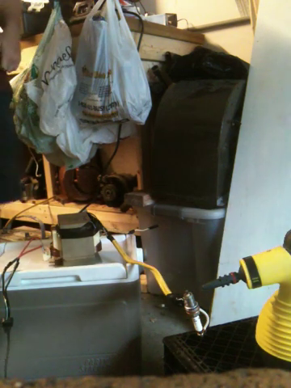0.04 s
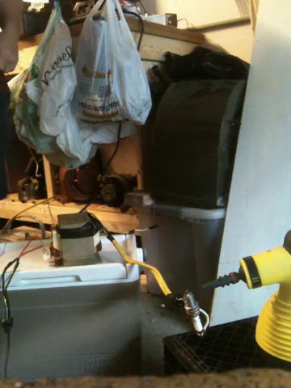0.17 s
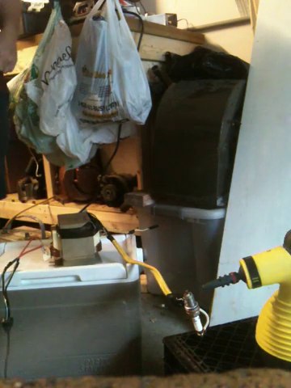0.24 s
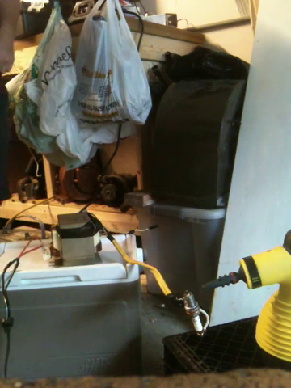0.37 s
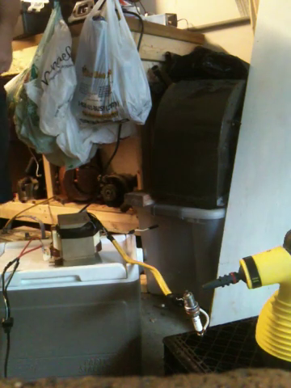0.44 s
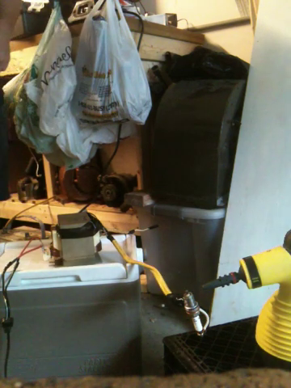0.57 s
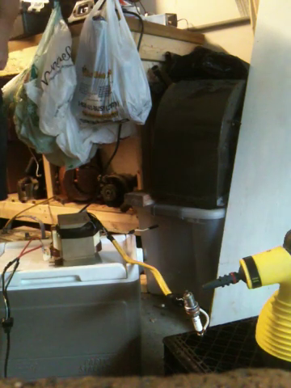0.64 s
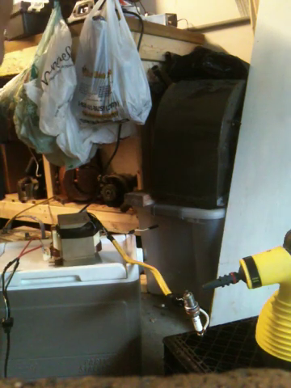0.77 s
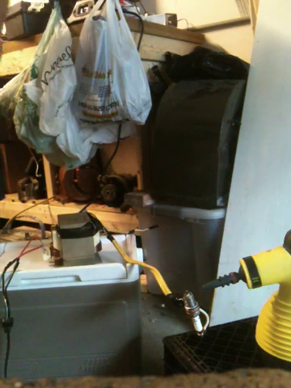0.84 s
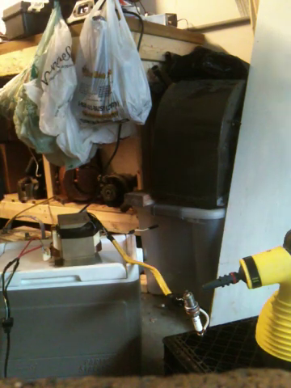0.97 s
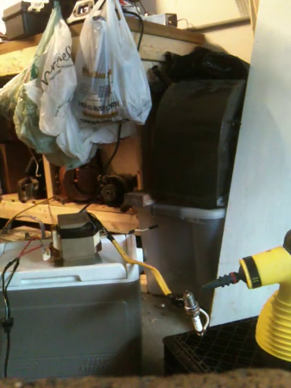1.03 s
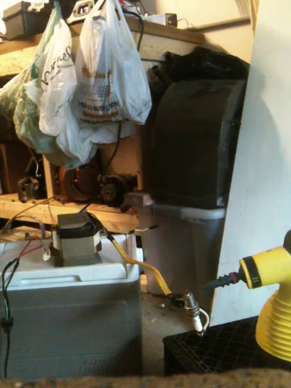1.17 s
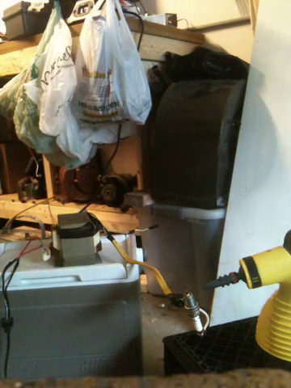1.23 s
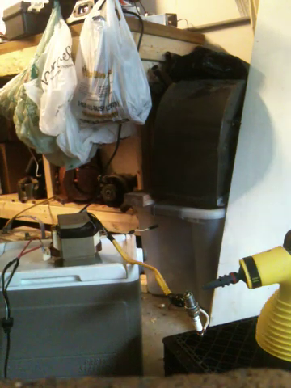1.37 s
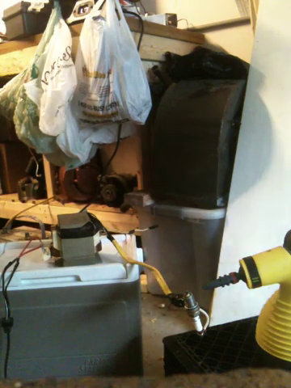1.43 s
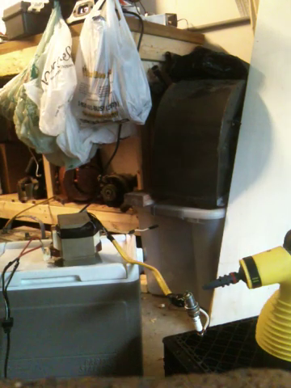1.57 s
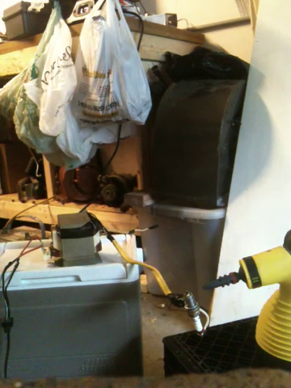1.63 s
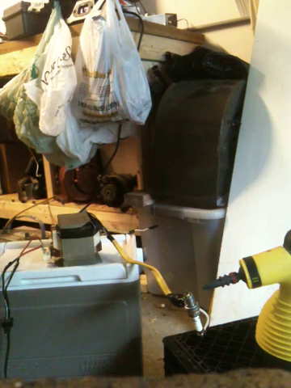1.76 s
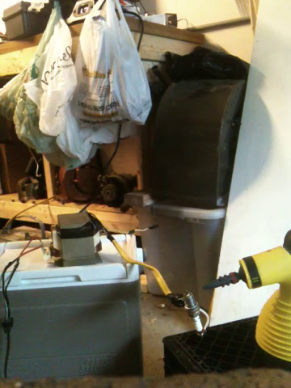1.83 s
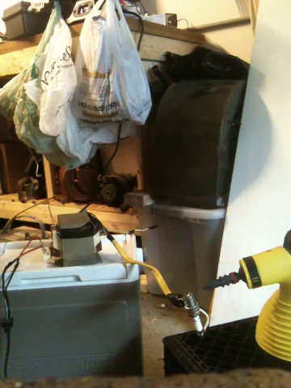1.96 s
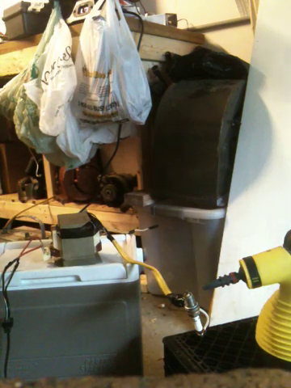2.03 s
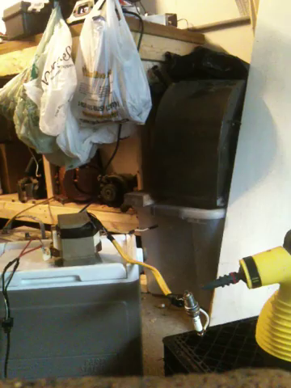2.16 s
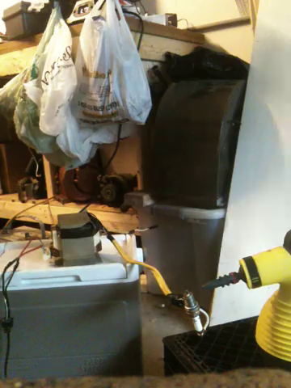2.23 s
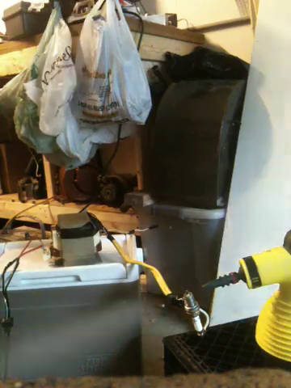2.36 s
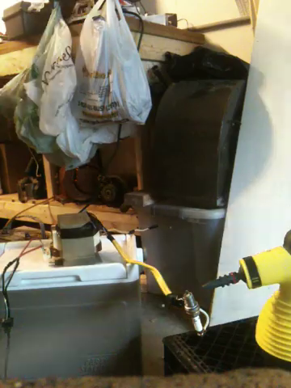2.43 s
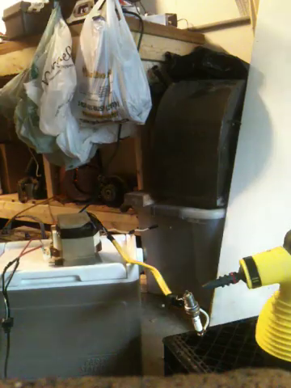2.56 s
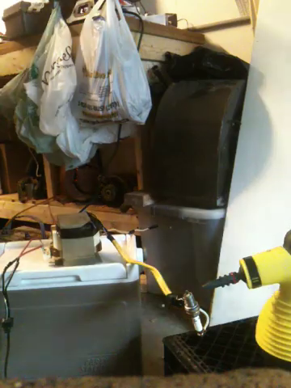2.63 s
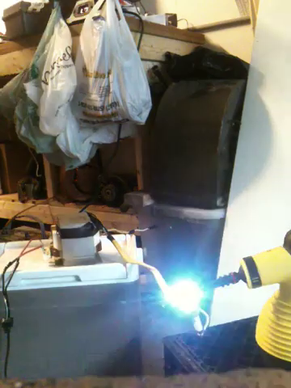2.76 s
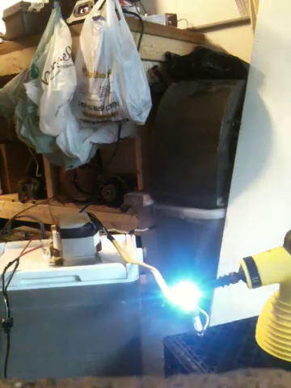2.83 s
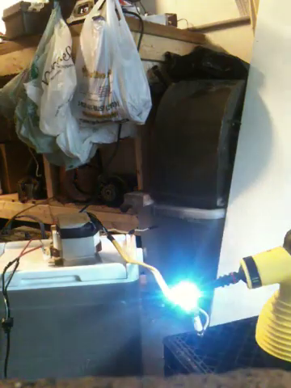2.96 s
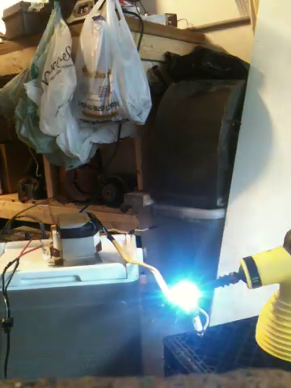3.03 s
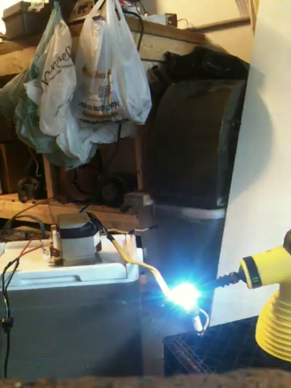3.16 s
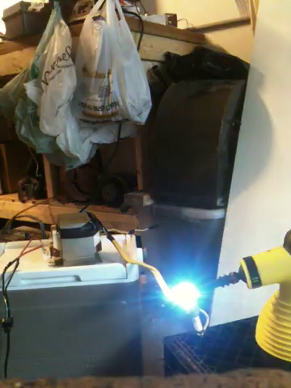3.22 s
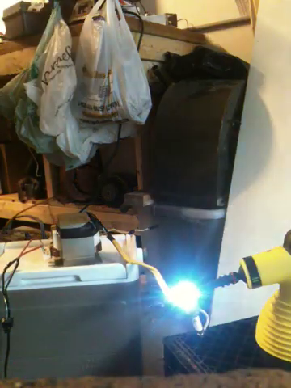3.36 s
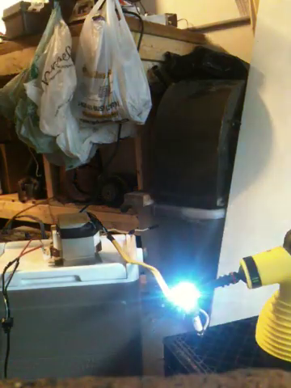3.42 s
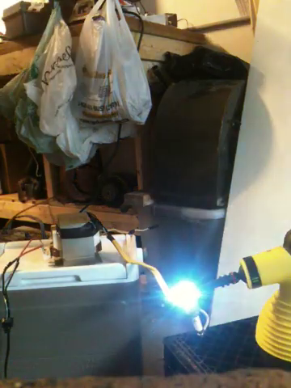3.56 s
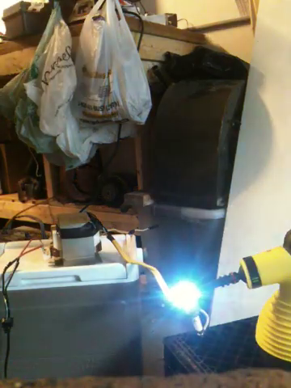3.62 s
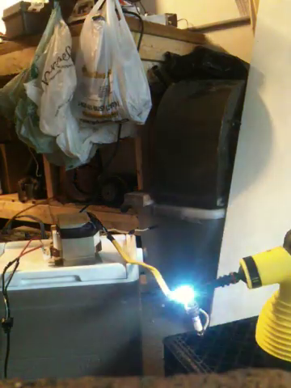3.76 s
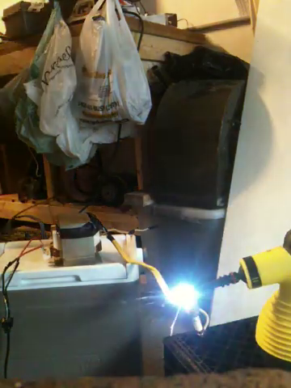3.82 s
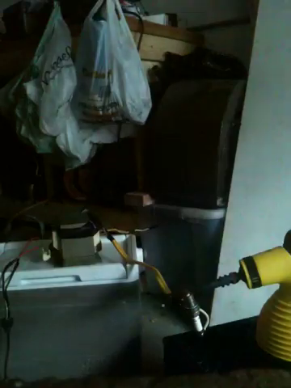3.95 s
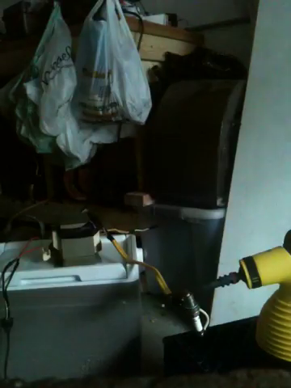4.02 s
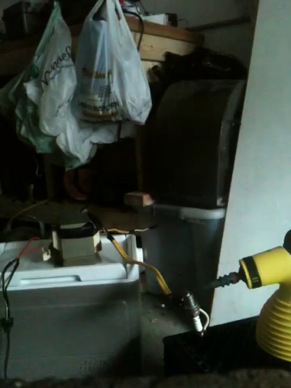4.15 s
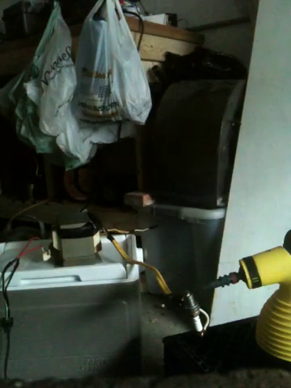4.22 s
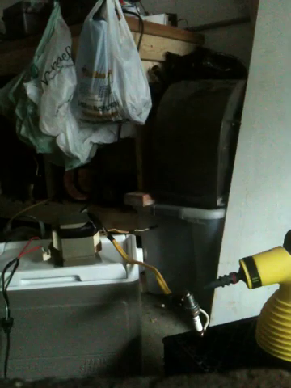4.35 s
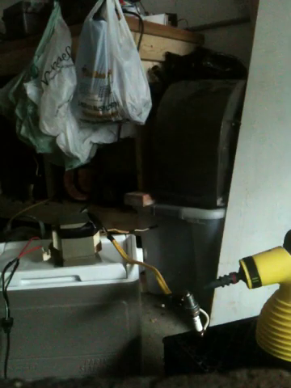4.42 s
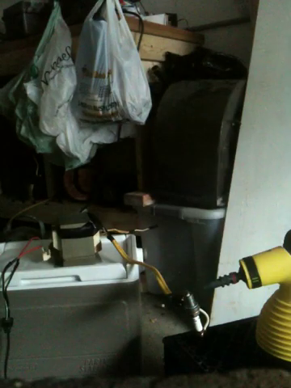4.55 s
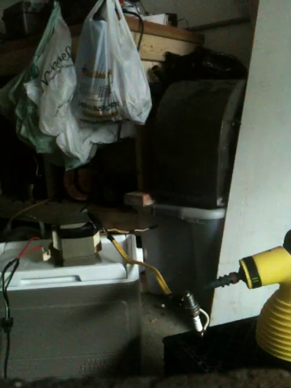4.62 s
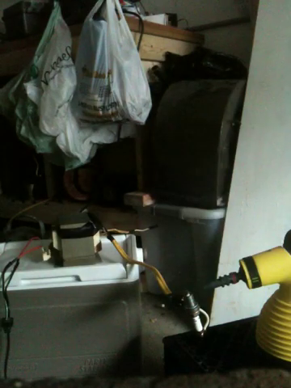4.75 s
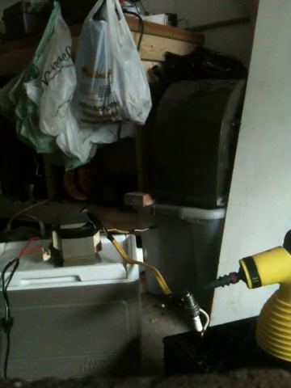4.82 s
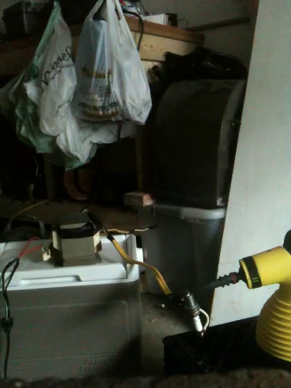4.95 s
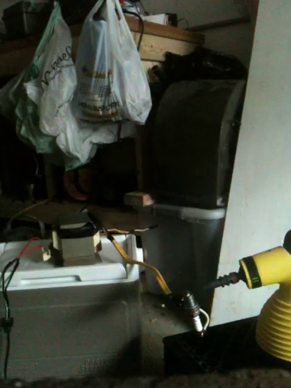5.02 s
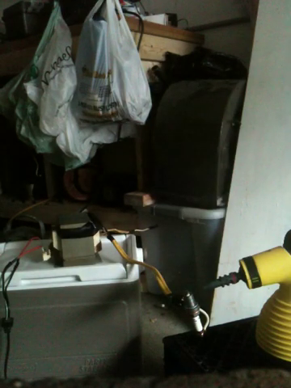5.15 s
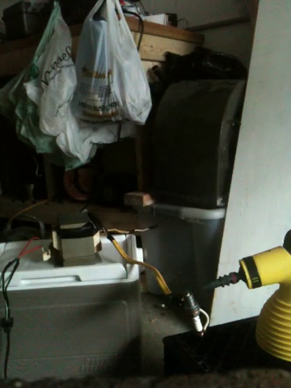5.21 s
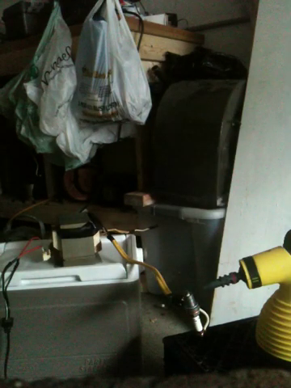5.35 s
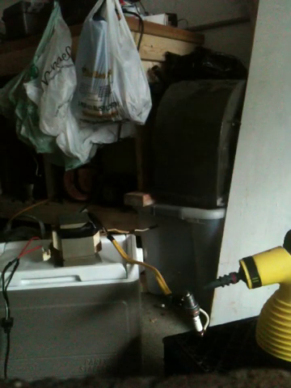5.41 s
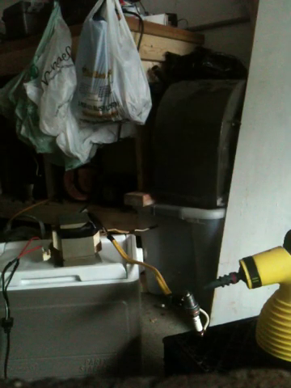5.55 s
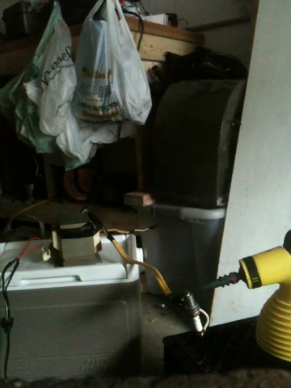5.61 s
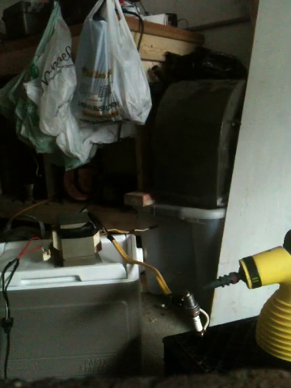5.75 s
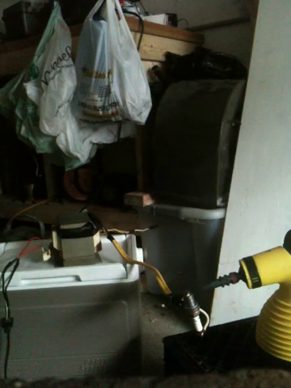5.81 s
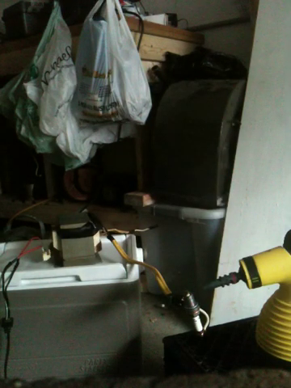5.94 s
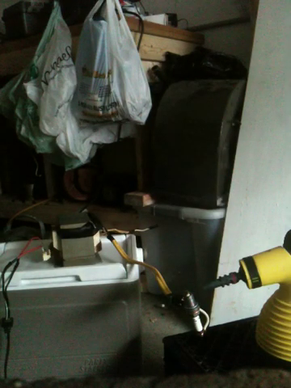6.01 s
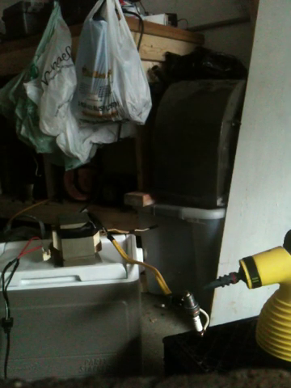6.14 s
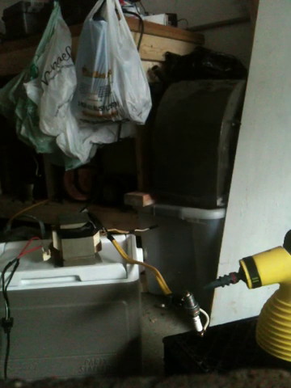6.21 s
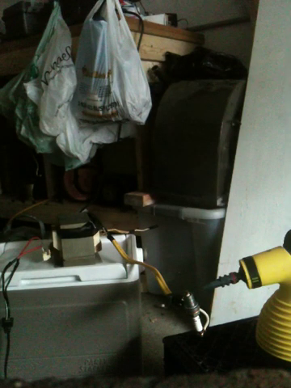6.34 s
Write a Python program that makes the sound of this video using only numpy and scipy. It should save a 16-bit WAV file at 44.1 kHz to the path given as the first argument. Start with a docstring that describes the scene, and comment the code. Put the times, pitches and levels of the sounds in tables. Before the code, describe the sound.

After a few bench knocks over faint steam hiss, an electric arc bursts out with harsh rasping buzz and sharp cracks for about a second, then stops.

```python
"""Spark gap in a shed

A mains transformer drives an arc across a spark gap, one breakdown per half cycle, in a cluttered shed.
Noise bursts and gated grains form the arc; filtered noise reverberation echoes it, and sines hum.
A steam nozzle hisses faintly as coloured noise; clicks, resonators and grainy bursts
make small knocks, rattles and scuffs on the bench."""
import sys
import numpy as np
from scipy import signal
from scipy.fft import rfft, irfft
from scipy.io import wavfile
from scipy.ndimage import uniform_filter1d

SR = 44100
rng = np.random.default_rng(int(sys.argv[2]) if len(sys.argv) > 2 else 0)


def to_wav(s):
    """Save 16-bit WAV."""
    ch = np.atleast_2d(s).T  # columns
    pcm = np.round(np.clip(ch, -1, 1) * 32767)  # PCM
    wavfile.write(sys.argv[1], SR, pcm.astype(np.int16))


def boost(x):
    """Linear amplitude factor 10**(x/20) for a level x in decibels (scalar or array-like)."""
    u = np.asarray(x, float) / 20
    return 10 ** u


N = 280476
MAINS_HZ, FIRST_STRIKE_S = 60, 2.8432

# arc between strong breakdowns: (time [s], level [dB])
ARC_LEVEL = [(2.85, -31.5), (2.93, -27), (3.0, -25), (3.1, -25.5), (3.154, -24.5), (3.2, -23.5), (3.4, -22),
             (3.5, -23), (3.565, -22.5), (3.62, -21.5), (3.72, -22), (3.8, -22), (3.86, -23.5),
             (3.92, -23.5), (3.973, -22)]
ARC_END_S = ARC_LEVEL[-1][0]
# strong breakdowns: (time [s], strength [dB], flare [Hz], spit band centre [Hz], afterglow t60 [s])
STRONG_BREAKDOWNS = [(2.8433, 2, 6170, 3600, .2), (2.9416, -4, 5540, 4300, 0.18),
                     (2.983, -12, 4330, 4000, 0.18), (3.0183, 3.5, 3860, 4200, 0.15),
                     (3.1667, 6.5, 4870, 4600, 0.27), (3.2692, 6, 5440, 5300, 0.21),
                     (3.3344, 5.5, 4000, 3900, 0.35), (3.3845, 7, 6600, 5200, 0.14),
                     (3.418, 8.5, 4300, 4200, 0.081), (3.4676, 3.5, 5040, 4800, .2),
                     (3.4846, 5, 6050, 4900, 0.19), (3.5849, 9, 5450, 4400, 0.46),
                     (3.651, 4, 5200, 4300, 0.8), (3.8181, 8, 5330, 3900, 0.42),
                     (3.9341, 4, 6560, 4800, 0.16), (3.9491, 7, 4560, 4400, 0.19)]


def in_time(rows):
    """Second column of a curve, sample by sample, its ends held."""
    s, value = np.transpose(rows)
    return np.interp(np.arange(N) / SR, s, value)


def at_hz(points, hz):
    """A spectrum read on a log-frequency axis."""
    points_hz, db = np.transpose(points)
    return np.interp(np.log(hz), np.log(points_hz), db)


def unit(x):
    """Scaled to energy 1."""
    return x / np.sqrt(np.sum(x ** 2))


def drift(knots_per_s):
    """Gaussian knots of spread 1 joined by straight lines."""
    knots = rng.standard_normal(1000)
    return np.interp(np.arange(N) / SR * knots_per_s, np.arange(1000), knots)


def bandpass(x, edges_hz, order=2):
    """Butterworth band filter."""
    return signal.sosfilt(signal.butter(order, edges_hz, "band", fs=SR, output="sos"), x)


def highpass(x, edge_hz, order):
    """Butterworth high-pass filter."""
    return signal.sosfilt(signal.butter(order, edge_hz, "high", fs=SR, output="sos"), x)


def colour(x, spectrum):
    """Minimum-phase filter with the given spectrum; white noise keeps its power."""
    size = 8192
    hz = np.arange(size // 2 + 1) * SR / size + 1
    cepstrum = irfft(np.log(boost(at_hz(spectrum, hz))))
    cepstrum[1:size // 2] *= 2      # folding gives the minimum phase
    cepstrum[size // 2 + 1:] = 0
    response = unit(irfft(np.exp(rfft(cepstrum))))
    return signal.fftconvolve(x, response)[:len(x)]


def clicks(s, db):
    """Single samples at given times and heights."""
    out = np.zeros(N)
    np.add.at(out, (np.asarray(s) * SR).astype(int), boost(db))
    return out


def burst(length_s):
    """Noise puff under a Hann window, its net push reversed and about halved; energy 1."""
    shape = np.hanning(int(length_s * SR))
    puff = shape * rng.standard_normal(len(shape))
    return unit(puff - 1.52 * shape * puff.sum() / shape.sum())


def ring(x, hz, t60_s):
    """Resonator: a unit click starts a decaying sine of height 1."""
    r = boost(-60 / (t60_s * SR))
    w = 2 * np.pi * hz / SR
    return signal.lfilter([0, np.sin(w)], [1, -2 * r * np.cos(w), r * r], x + 1e-18)


def steam():
    """Jet turbulence as coloured noise whose level flutters a little."""
    # (time [s], level [dB])
    jet_level = [(0, -48), (.7, -47.5), (2.8, -46), (4.2, -45), (6.36, -44.5)]
    # spectrum: (frequency [Hz], density [dB per Hz])
    jet_colour = [(35, -56), (60, -27.5), (231, -4.5), (266, -12.5), (353, -9), (469, -11), (1070, -2),
                  (1560, -6.5), (2230, -1), (3250, -1.5), (4320, 1), (5470, 0), (8770, -7.5), (10900, -6.5),
                  (17000, -24)]
    flutter_db = .5 * drift(2.62) + 0.46 * drift(25)
    return boost(in_time(jet_level) + flutter_db) * colour(rng.standard_normal(N), jet_colour)


def hum():
    """Core pull at mains multiples with drifting levels, from the first strike; fades after the arc."""
    # (multiple of mains [1], rms level before drift [dB])
    harmonics = [(2, -52.5), (3, -61.5), (4, -58), (5, -57), (6, -59)]
    t = np.arange(N) / SR
    on = (t > FIRST_STRIKE_S) * boost(-60 * np.maximum(t - ARC_END_S, 0) / 0.25)
    out = np.zeros(N)
    for k, db in harmonics:
        level = np.sqrt(2) * boost(db + 3.4 * drift(11))
        out += level * np.sin(2 * np.pi * k * MAINS_HZ * t)
    return on * out


def scuffs():
    """Something nudged along the bench: a grainy scrape that swells and fades."""
    # (time [s], length [s], strength [dB])
    nudges = [(4.741, 0.036, -8.5), (5.113, 0.023, -5.5)]
    out = np.zeros(N)
    for s, length_s, db in nudges:
        shape = np.hanning(int(length_s * SR))
        grit = rng.standard_normal(len(shape)) * boost(5 * rng.standard_normal(len(shape)))
        out += signal.fftconvolve(clicks([s], db), unit(shape * grit))[:N]
    return bandpass(out, [985, 6300])


def rattles():
    """Loose parts chatter: uneven, fading taps ring one mode each."""
    # (time [s], length [s], mode [Hz], level [dB], t60 [s])
    chatters = [(.0105, .075, 4480, -38.5, .018), (.015, .042, 3550, -39, .018),
                (.234, .036, 3350, -38, .01), (.233, .03, 5350, -45, .006), (1.959, .026, 3900, -48, .004),
                (2.409, .06, 4260, -35, .045), (2.41, .055, 2450, -37, .008),
                (2.412, .026, 3500, -41, .008)]
    taps_per_s, first_tap_db = 450, 5
    out, t = np.zeros(N), np.arange(N) / SR
    for s, length_s, hz, db, t60_s in chatters:
        hits = rng.random(N) < taps_per_s / SR
        taps = hits * boost(3.5 * rng.standard_normal(N)) * rng.choice([-1, 1], N)
        fade = (t >= s) * np.clip(1 - (t - s) / length_s, 0, 1) ** .7
        out += ring(boost(db) * taps * fade + clicks([s], db + first_tap_db), hz, t60_s)
    return out


def knocks():
    """Knocks and strong wall returns: each has a broad snap, a dull thud and a short ring."""
    # (time [s], snap [dB], thud [dB], body [Hz], body height [dB])
    impulses = [(.008, -40, -25, 195, -40.5), (.0094, -7, -7.5, 1270, -30), (0.2252, -7, -18, 770, -22.5),
                (0.236, -26, -9, 784, -29), (1.949, -27, -30, 1000, -32), (1.9579, -10.5, -34, 1190, -26.5),
                (1.96, -17, -33, 3300, -28), (2.317, -25, -0.5, 210, -31.5), (2.327, -30, -15, 720, -26),
                (2.402, 0, -16, 1140, -19.5), (2.4021, -30, -32, 2370, -16.5), (2.405, -30, -25, 6200, -22),
                (4.758, -15, -18, 900, -34.5), (5.134, -30, -22, 1100, -29.5)]
    snap_s, body_t60_cycles = .0005, 6
    out = np.zeros(N)
    for s, snap_db, thud_db, body_hz, body_db in impulses:
        snap = signal.fftconvolve(clicks([s], snap_db), burst(snap_s))[:N]
        out += bandpass(snap, [900, 9000])
        out += bandpass(clicks([s], thud_db) + 1e-18, [170, 1200])
        out += ring(clicks([s], body_db), body_hz, body_t60_cycles / body_hz)
    return out


def cracks():
    """A strong breakdown: sharp front, noise puff, and a flare pitched by the length of its channel."""
    crack_s, flare_db, flare_t60_s = .0014, -23, .006
    out = np.zeros(N)
    for s, db, flare_hz, _, _ in STRONG_BREAKDOWNS:
        out += clicks([s], db - 2.5)
        out += signal.fftconvolve(clicks([s], db - 5), burst(crack_s))[:N]
        out += ring(clicks([s], db + flare_db), flare_hz, flare_t60_s)
    return highpass(out, 865, 1)     # little bass


def afterglows():
    """Envelope after each strong breakdown: it jumps and dies away."""
    t = np.arange(N) / SR
    return [(t >= s) * boost(db - 60 * np.maximum(t - s, 0) / t60_s)
            for s, db, _, _, t60_s in STRONG_BREAKDOWNS]


def afterglow():
    """The arc burns harder after strong breakdowns: summed added strength until it ends."""
    return boost(-36) * sum(afterglows()) * (np.arange(N) / SR < ARC_END_S)


def spits(grains):
    """The fresh channel spits in a bright band of its own while it glows."""
    spit_db, width_hz, rise_s = -31, 2000, 0.0065
    out, r = np.zeros(N), np.exp(-1 / (rise_s * SR))
    arc_on = np.arange(N) / SR < ARC_END_S
    for glow, (_, _, _, spit_hz, _) in zip(afterglows(), STRONG_BREAKDOWNS):
        burning = signal.lfilter([1 - r], [1, -r], glow + 1e-18) * arc_on
        edges_hz = [spit_hz - width_hz / 2, spit_hz + width_hz / 2]
        out += bandpass(burning * grains + 1e-18, edges_hz, order=1)
    return boost(spit_db) * out


def arc():
    """One breakdown per half cycle, uneven in time and force, and a sizzle while current flows."""
    # spectrum: (frequency [Hz], density [dB per Hz])
    arc_colour = [(76, -31), (130, -8), (383, -7), (489, -0.5), (650, -0.5), (815, 1), (959, -2.5),
                  (1060, 4.5), (1450, -5), (1850, -4), (2010, -15), (2120, -3), (2770, -5.5), (5430, -5.5),
                  (8670, -15), (10600, -13.5), (13300, -23), (17000, -44)]
    # steady narrow resonances of the shed, heard on the arc: (mode [Hz], height [dB], t60 [s])
    room_modes = [(2144, -53, .12), (836, -54, .1), (1022, -52, .1)]
    calm_treble_db, treble_db_per_swell_db = -2.5, 3
    t = np.arange(N) / SR

    strikes_s = np.arange(FIRST_STRIKE_S, ARC_END_S, .5 / MAINS_HZ)
    count = len(strikes_s)
    force_db = 2.0 * rng.standard_normal(count)
    force_db += 3.9 * (-1) ** np.arange(count)      # one polarity strikes harder
    train = clicks(strikes_s + .0007 * rng.standard_normal(count), force_db)
    shape_no = rng.integers(0, 30, N)      # spark channels draw on 30 shapes
    sparks = sum(signal.fftconvolve(train * (shape_no == k), burst(0.0017))[:N] for k in range(30))
    sparks *= np.sqrt(SR / MAINS_HZ / 2)

    current_gate = np.sin(2 * np.pi * MAINS_HZ * (t - FIRST_STRIKE_S)) ** 2
    grains = rng.standard_normal(N) * boost(4.4 * rng.standard_normal(N)) * current_gate

    level = boost(in_time(ARC_LEVEL))
    swell = 1 + afterglow() / level
    burning = (t >= ARC_LEVEL[0][0]) & (t <= ARC_END_S)
    calm = np.where(burning, level, boost(-200))
    steady = calm * swell * (boost(-5.0) * sparks + boost(-7.0) * grains)
    # a hard, short discharge has steeper edges
    sharpness = boost(calm_treble_db) * swell ** treble_db_per_swell_db
    steady += (sharpness - 1) * highpass(steady, 6000, 2)

    discharge = colour(steady + cracks() + spits(grains), arc_colour)
    return discharge + sum(boost(db) * ring(discharge, hz, t60_s) for hz, db, t60_s in room_modes)


def evened(response):
    """Levels the echo response's broad treble unevenness, keeping its fine peaks."""
    narrow_hz, wide_hz = 500, 2500
    spectrum, bin_hz = rfft(response), SR / len(response)
    power = np.abs(spectrum) ** 2
    narrow = uniform_filter1d(power, size=int(narrow_hz / bin_hz))
    wide = uniform_filter1d(power, size=int(wide_hz / bin_hz))
    share = np.clip(np.arange(len(spectrum)) * bin_hz / wide_hz - .5, 0, 1)     # treble only
    return irfft(spectrum * (wide / narrow) ** (share / 2))[:len(response) * 9 // 10]


def shed(x):
    """Near echoes off the bench, a short lull, then dense echoes that die band by band."""
    # (frequency [Hz], t60 [s])
    decay = [(150, 0.39), (600, 0.26), (2000, 0.35), (5000, 0.24), (11000, 0.12)]
    # thin walls let the lows out: (frequency [Hz], level [dB])
    echo_colour = [(85, -16), (170, -3), (350, -8), (700, -9), (1400, -6), (2800, 0)]
    wall_delay_s, first_wall_db, lull_db, near_db = .0095, -13.5, -12, -1.5
    bench_lags_s, scatter = (.0003, .0007, .0013), .55

    t = np.arange(SR // 2) / SR
    edges_hz = 60 * 2. ** np.arange(9)
    tail = np.zeros(len(t))
    for low, high in zip(edges_hz, edges_hz[1:]):
        centre_hz = np.sqrt(low * high)
        t60_s = at_hz(decay, centre_hz)
        band = bandpass(rng.standard_normal(len(t)), [low, high])
        tail += band * boost(at_hz(echo_colour, centre_hz) - 60 * t / t60_s) / np.sqrt(t60_s)
    tail = unit(tail * np.clip((t - wall_delay_s) / 0.0005, boost(lull_db), 1))

    near = 1. * (t == 0)
    for lag_s in bench_lags_s:      # all-pass: spreads the sound without colouring it
        taps = np.r_[1, np.zeros(int(lag_s * SR) - 1), -scatter]
        near = signal.lfilter(taps[::-1], taps, near + 1e-18)
    first_wall = np.roll(near, int(wall_delay_s * SR))      # nearest wall returns the cluster once
    response = tail + boost(near_db) * near + boost(first_wall_db) * first_wall
    return signal.fftconvolve(x, unit(evened(response)))[:N]


def scene():
    """Arc, knocks and scuffs are heard through the shed, rattles partly; hum and steam directly."""
    chatter = rattles()
    echoed = shed(arc() + knocks() + scuffs() + boost(-6) * chatter)
    return (echoed + chatter + hum() + steam())[None]


def band_limit(x):
    """A steep low-pass at the top of the band."""
    return signal.sosfilt(signal.butter(12, 17600, fs=SR, output="sos"), x)


def record(dry):
    """Small microphone: no deep bass, a few resonances, rounded peaks and a cut top."""
    # shed and microphone housing resonances: (frequency [Hz], width [Hz], lift [dB])
    resonances = [(836, 30, 3), (1120, 300, 3), (1345, 25, 3), (2150, 50, 4), (3060, 130, 1), (3735, 50, 2),
                  (4366, 60, 2), (5272, 70, 4.5), (6550, 60, 2), (10750, 600, 2)]
    x = highpass(dry, 95, 3)
    for hz, width_hz, db in resonances:
        b, a = signal.iirpeak(hz, hz / width_hz, fs=SR)
        x = x + (boost(db) - 1) * signal.lfilter(b, a, x)
    x = .55 * np.tanh(x / .55)
    x = signal.sosfilt(signal.cheby2(10, 60, 18200, fs=SR, output="sos"), x)
    return band_limit(x)


dry = scene()
out = record(dry)
to_wav(out)
```